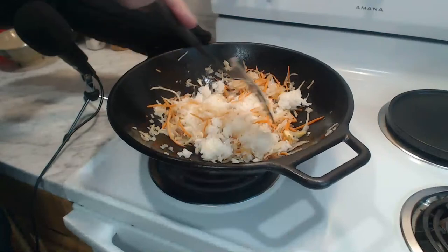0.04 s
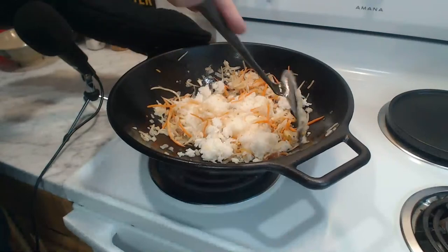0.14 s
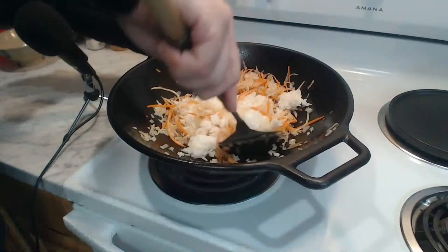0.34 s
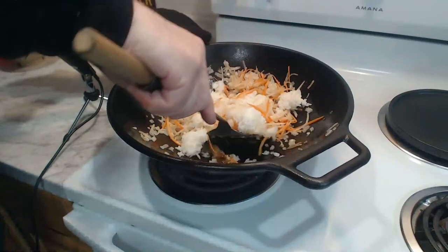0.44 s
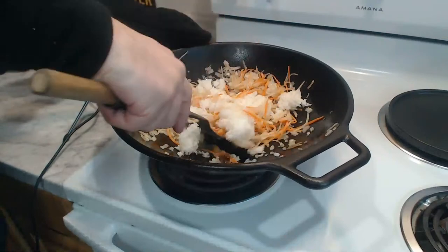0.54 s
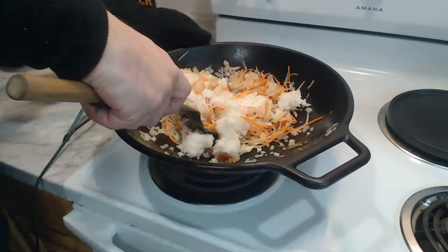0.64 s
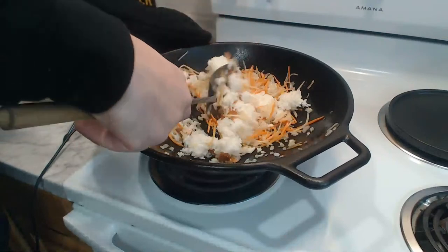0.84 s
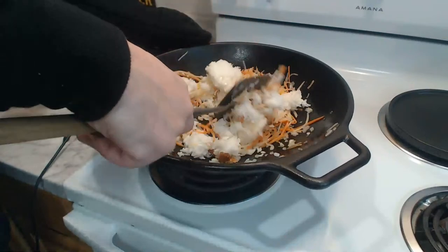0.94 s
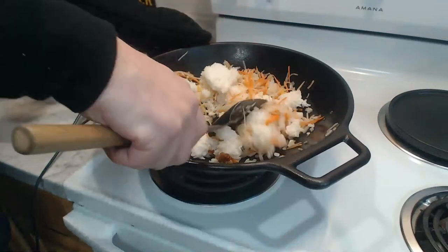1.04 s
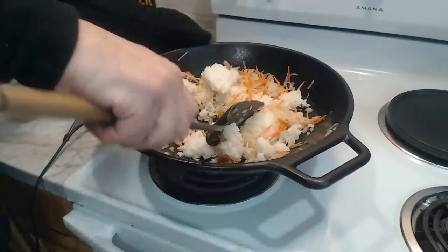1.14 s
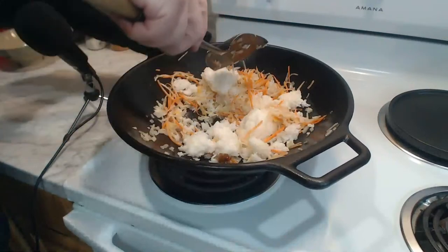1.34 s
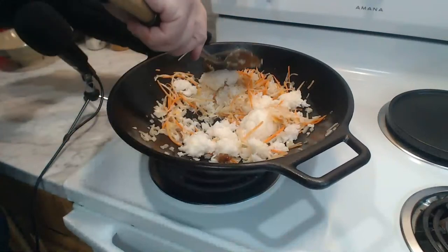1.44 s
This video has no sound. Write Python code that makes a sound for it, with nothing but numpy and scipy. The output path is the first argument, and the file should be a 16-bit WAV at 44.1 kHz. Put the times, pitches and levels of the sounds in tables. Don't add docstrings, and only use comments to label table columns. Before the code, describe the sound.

A metal spatula hits a cast iron wok with a bright ringing clank, scrapes gratingly down into rice, pauses, then knocks the bottom more softly; faint food hiss, quiet home kitchen, close microphone.

```python
import sys
import numpy as np
from scipy import signal
from scipy.fft import rfft, irfft, next_fast_len
from scipy.io import wavfile
from scipy.ndimage import uniform_filter1d, map_coordinates

SR = 44100
rng = np.random.default_rng(int(sys.argv[2]) if len(sys.argv) > 2 else 0)


def field_ratio(decibels):
    return 10 ** (np.asarray(decibels, dtype=float) / 20)


def master_out(mix):
    frames = np.transpose(np.atleast_2d(mix))
    ceiling = np.clip(frames, -1, 1)
    pcm = np.round(ceiling * 32767).astype(np.int16)
    wavfile.write(sys.argv[1], SR, pcm)


N = 66150
T = np.arange(N) / SR


def unit(x):
    return x / np.sqrt(np.mean(x ** 2) + 1e-20)


def along(points, hz):
    f, v = np.transpose(points)
    return np.interp(np.log(hz + 1), np.log(f + 1), v)


def joined(hz, rows):
    return [(f, *row) for f, row in zip(hz, rows)]


def wobble(rate):
    return map_coordinates(rng.standard_normal(int(N * rate / SR) + 4), [T * rate])


def filtered(x, response):
    m = next_fast_len(N + SR // 2)
    return irfft(rfft(x, m) * response(np.fft.rfftfreq(m, 1 / SR)), m)[:N]


def highpass(corner_hz):
    return lambda f: (1j * f / (corner_hz + 1j * f)) ** 2


def resonant(peaks):
    def response(f):
        total = 0
        for k, (hz, width, db) in enumerate(peaks):
            damping = 1j * f * width
            total = total + (-1) ** k * field_ratio(db) * damping / (hz * hz - f * f + damping)
        return total
    return response


def dying(t60s, spectrum=((1, 0),)):
    hz, t, z = signal.stft(rng.standard_normal(SR // 2), SR, nperseg=128)
    z = z * field_ratio(along(spectrum, hz))[:, None]
    z = z / unit(np.abs(z)).mean() / np.abs(z).std()
    decay = field_ratio(-60 * t / along(t60s, hz)[:, None])
    return signal.istft(z * decay, SR, nperseg=128)[1][:SR // 2]


def rush(spectrum, patchy_db):
    z = signal.stft(rng.standard_normal(N), nperseg=512)[2]
    field = uniform_filter1d(rng.standard_normal(z.shape), 4, 0)
    field = uniform_filter1d(field, 10, 1)
    x = signal.istft(z * field_ratio(patchy_db * unit(field)), nperseg=512)[1][:N]
    return unit(filtered(x, lambda hz: field_ratio(along(spectrum, hz))))


# (time [s], level [dB])
SIZZLE = [(0, -72), (.2, -75), (.5, -70.5), (.65, -71), (1.0, -73.5), (1.11, -71.5), (1.15, -65.5),
          (1.5, -67.5)]
# (frequency [Hz], level [dB per Hz])
FIZZ = [(900, -27.5), (1500, -9.5), (2400, -3.5), (4300, -4.5), (7500, -7), (10000, -1), (12500, -8),
        (15800, -10)]
# (frequency [Hz], level [dB per Hz])
AIR = [(20, -21), (60, -15.5), (97, -13.5), (282, -5.5), (572, -9.5), (1050, -9.5), (1300, -17),
       (3000, -39)]
# (frequency [Hz], level [dB])
HUM = [(120, -74.5), (240, -82), (360, -80.5), (572, -82)]


def kitchen():
    fizz = field_ratio(np.interp(T, *np.transpose(SIZZLE)) + 0.78 * wobble(25)) * rush(FIZZ, patchy_db=1.6)
    air_db = -74.5 + 4.5 * T + 2.3 * wobble(2.6)
    air = field_ratio(air_db) * rush(AIR, patchy_db=2.5)
    hum = np.zeros(N)
    for hz, db in HUM:
        level = field_ratio(db + 2.5 + 0.8 * wobble(6.8))
        hum += level * np.sin(2 * np.pi * hz * T + 0.35 * wobble(1.8))
    return fizz + air + hum


# (frequency [Hz], width [Hz], level [dB])
CRACK = [(10000, 2000, 3.5), (5600, 2600, -9)]


def struck(contacts, modes, spread_db, attack_s, low_hz, body_db, spectrum, t60s, crack_db, flutter):
    muffle_s, muffle_db_per_s = 0.18, 132
    flutter_per_s, knots = 100, 99
    crack_grows, crack_t60_s = 1.7, 0.008
    rings, cracks = np.zeros(N + SR), np.zeros(N + SR)
    t = T[:SR // 4]
    attack = 1 - np.exp(-t / attack_s)
    muffle = field_ratio(-muffle_db_per_s * np.maximum(t - muffle_s, 0))
    shape = attack * muffle * np.sqrt(1 - t / t[-1])

    def drift():
        return flutter * np.interp(t * flutter_per_s, np.arange(knots), rng.standard_normal(knots))

    for s, db in contacts:
        ring = np.zeros(len(t))
        for hz, mode_db, t60 in modes:
            decay = field_ratio(mode_db + spread_db * rng.normal() - 60 * t / t60)
            ring += decay * (1 + drift()) * np.sin(2 * np.pi * hz * t + drift())
        body = dying(t60s, spectrum)[:len(t)]
        body = field_ratio(body_db) * body / np.std(body[:256])
        crack = field_ratio(crack_grows * db + crack_db - 60 * t / crack_t60_s) * rng.standard_normal(len(t))
        start = round(s * SR)
        rings[start:start + len(t)] += field_ratio(db - 8) * shape * (ring + body)
        cracks[start:start + len(t)] += crack
    return filtered(rings[:N], highpass(low_hz)) + filtered(cracks[:N], resonant(CRACK))


# (time [s], strength [dB])
BLOWS = [
    (.1945, -41),
    (.1985, -32),
    (.2, -29),
    (.2015, -4),
    (.2045, -10.5),
    (.2078, -10),
    (.2198, -19.5),
    (.2445, -20),
    (.275, -27),
]
RIM_HZ = [770, 1068, 1109, 1244, 1432, 1902, 2083, 2245, 2545, 2800, 2885, 3138, 3246, 3558]
# (level [dB], t60 [s])
RIM = [(-21.5, 0.17), (-17, 0.2), (-7, 0.13), (-4, 0.079), (-21.5, 0.62), (-19, 0.14), (-32.5, 0.32),
       (-34.5, 0.27), (-17.5, 0.24), (-11.5, 0.52), (-12, 0.21), (-19.5, 0.34), (-22, 0.05), (-23.5, 0.62)]
LIP_HZ = [3801, 4037, 4445, 4578, 4641, 4776, 4857, 5184, 5410, 5706, 5920, 6928, 7154, 7497]
# (level [dB], t60 [s])
LIP = [(-21.5, .25), (-4, 0.16), (-17, 0.26), (-17.5, 0.46), (-16.5, 0.15), (-13, 0.22), (-18.5, 0.4),
       (-20.5, 0.08), (-26.5, 0.11), (-19, .1), (2, 0.086), (-27, 0.28), (-27.5, 0.25), (-12.5, 0.18)]
# (frequency [Hz], level [dB], t60 [s])
BLADE = [(8193, -8.5, 0.23), (8270, 1.5, 0.083), (8820, -3, 0.44), (9440, -7.5, 0.6), (10460, 1, .04),
         (10670, -9, 0.045), (12400, -17.5, 0.47), (11400, -28, .3), (14600, -21, 0.27)]
# (frequency [Hz], level [dB per Hz])
CLANG = [(240, -77), (400, -49.5), (1080, -8), (2370, -20), (2800, -6.5), (5850, -3.5), (6510, -21),
         (9410, -10.5), (15600, -34)]
# (frequency [Hz], t60 [s])
CLANG_T60 = [(150, 0.094), (1000, 0.07), (4000, 0.058), (12000, 0.15)]


def rim_blow():
    blade = [(hz, db - 18, t60) for hz, db, t60 in BLADE]
    modes = joined(RIM_HZ, RIM) + joined(LIP_HZ, LIP) + blade
    return struck(BLOWS, modes, spread_db=2.4, attack_s=0.0015, low_hz=410, body_db=-4.5,
                  spectrum=CLANG, t60s=CLANG_T60, crack_db=6, flutter=0.45)


# (time [s], pressure [dB], bare metal contact [dB])
STROKE = [
    (0.2, -46, 14.5),
    (0.233, -37.5, 10.5),
    (0.292, -28.5, 4),
    (0.334, -35, -1.5),
    (0.394, -32, -4),
    (0.439, -39, -7.5),
    (0.479, -42.5, -10.5),
    (0.546, -52.5, -10.5),
    (0.63, -81, 7.5),
]
# (frequency [Hz], width [Hz], level [dB])
WALL = [(640, 20, -15.5), (910, 35, 0), (1113, 38, -4.5), (1437, 46, 1.5), (1746, 35, -2), (1865, 64, -0.5),
        (2530, 70, -9.5), (2685, 57, -6.5), (3230, 60, -10)]
# (frequency [Hz], width [Hz], level [dB])
FLOOR = [(616, 49, -13), (801, 27, -5), (902, 53, -3.5), (1304, 91, -6.5), (1643, 75, -1.5), (1714, 47, 1),
         (1778, 100, -4), (2666, 51, -10.5), (3220, 79, -15)]
# (frequency [Hz], width [Hz], level [dB])
EDGE = [(2610, 96, -10.5), (3760, 70, 0), (4656, 150, -1), (4800, 100, -7.5), (6000, 84, -12),
        (7523, 70, -15.5), (8400, 130, -8.5), (9070, 100, -4), (10720, 300, -9)]
# (frequency [Hz], level [dB per Hz])
RASP = [(40, -30), (250, -18.5), (520, -24), (929, -3), (2270, -14), (4720, -7.5), (10600, -25),
        (15600, -25.5)]


def scrape():
    slips_per_s, slip_spread_db = 3700, 1.5
    s, press_db, bare_db = np.transpose(STROKE)
    press = field_ratio(np.interp(T, s, press_db, -120, -120) + 0.63 * wobble(70))
    bare = field_ratio(np.interp(T, s, bare_db) + 1.2 * wobble(40))
    slip_size = field_ratio(slip_spread_db * np.clip(rng.standard_normal(N), -2, 2))
    slips = (rng.random(N) < slips_per_s / SR) * slip_size * rng.choice([-1, 1], size=N)
    drive = unit(unit(slips) + 0.69 * rush([(1, 0)], patchy_db=1.5))
    bite = np.interp(T, (0.35, 0.3), [0.3, 1])
    low = np.interp(T, (0.37, 0.435), [0, 1])

    def through(db, force, response):
        return field_ratio(db) * filtered(force * drive, response) / np.std(filtered(drive, response))

    wall = through(-3.5, press * bite * np.sqrt(1 - low), resonant(WALL))
    floor = through(-4, press * np.sqrt(low), resonant(FLOOR))
    edge = through(-9.5, press * bare, resonant(EDGE))
    rasp = unit(filtered(drive, lambda hz: field_ratio(along(RASP, hz))))
    return wall + floor + edge + field_ratio(-4) * press * bare * rasp


# (time [s], frequency [Hz], level [dB], t60 [s])
STAND = [
    (0.204, 158.6, -31, 0.29),
    (.203, 167.7, -36, 0.65),
    (.222, 373, -39.5, 0.27),
    (1.123, 189, -43, 0.11),
]


def stand():
    thump = np.zeros(N)
    for s, hz, db, t60 in STAND:
        age = np.maximum(T - s, 0)
        swell = field_ratio(db - 60 * age / t60) * (1 - np.exp(-age / 0.0024))
        thump += swell * np.sin(2 * np.pi * hz * age)
    return filtered(thump, highpass(70))


# (time [s], length [s], frequency [Hz])
NUDGE_AT = [(.73, .08, 410), (.78, .13, 356), (.845, .06, 752), (.97, .064, 335), (1.074, .06, 405),
            (1.232, .064, 325), (1.27, .08, 2140), (1.385, .045, 5750), (1.425, .07, 348), (.73, .05, 250),
            (.82, .084, 4900), (.56, .09, 8500), (.807, .15, 7300), (1.078, .037, 8100), (.4, .16, 247),
            (.22, .36, 75), (.443, .055, 903), (.5, .045, 872), (.365, .05, 1785), (.29, .04, 945),
            (.32, .045, 1720), (.42, .09, 1720), (1.19, .04, 70), (1.22, .08, 2520), (.56, .16, 1500),
            (.27, .05, 2830), (.24, .02, 7497)]
# (width [Hz], level [dB])
NUDGES = [(20, -66.5), (18.1, -66.5), (25, -69.5), (30, -76.5), (30, -67), (35, -67.5), (40, -73),
          (900, -66.5), (20, -64.5), (220, -72), (110, -77), (5100, -71), (7000, -71.5), (6100, -63.5),
          (50, -65), (60.3, -64.5), (11.3, -45), (27, -46), (25, -46), (30, -43), (37.8, -42), (65, -48.5),
          (50, -80), (60, -67), (1500, -77), (90, -37), (90, -35.5)]


def nudges():
    out = np.zeros(N)
    for (s, length, hz), (width_hz, db) in zip(NUDGE_AT, NUDGES):
        mode = resonant([(hz, width_hz, 0)])
        tone = unit(filtered(rng.standard_normal(N), lambda f: mode(f) ** 2))
        span = np.sin(np.pi * np.clip((T - s) / length, 0, 1))
        even = np.linalg.norm(span) / (np.linalg.norm(span * tone) + 1e-12)
        out += field_ratio(db) * span * tone * even
    return out


# (time [s], strength [dB])
KNOCKS = [
    (.388, -34),
    (1.1185, -36),
    (1.1225, -23),
    (1.1265, -25.5),
    (1.1345, -25),
    (1.163, -48),
    (1.171, -35.5),
    (1.183, -49),
    (1.198, -46),
    (1.212, -45.5),
]
BOWL_HZ = [775, 1060, 1170, 1238, 1300, 1600, 2512, 2672, 2826, 3257, 3560, 3800, 4231, 4820, 5819]
# (level [dB], t60 [s])
BOWL = [(-10.5, 0.18), (-4, 0.091), (-8, 0.15), (-11.5, 0.23), (-9.5, 0.16), (-9, 0.1), (-12, 0.24),
        (-6, 0.094), (-18.5, 0.24), (-14, 0.079), (-2.5, 0.095), (-17, 0.21), (-19.5, 0.11), (-10.5, 0.08),
        (-22, 0.21)]
# (frequency [Hz], level [dB per Hz])
THUD = [(60, -42), (300, -6), (1100, -3.5), (1950, -24), (2710, -1), (3940, -17), (7000, -30), (16000, -47)]
# (frequency [Hz], t60 [s])
THUD_T60 = [(150, 0.08), (1500, 0.14), (8000, 0.14)]


def bottom_knock():
    return struck(KNOCKS, joined(BOWL_HZ, BOWL), spread_db=2.2, attack_s=0.0015, low_hz=140, body_db=-6,
                  spectrum=THUD, t60s=THUD_T60, crack_db=-33, flutter=0.9)


def squeak():
    span_s, climb_hz, level_db, rough = (1.215, 1.385), (3800, 4050), -74, 0.9
    turn = 2 * np.pi * np.cumsum(np.interp(T, span_s, climb_hz)) / SR
    swell = np.sin(np.pi * np.interp(T, span_s, [0, 1])).clip(0) ** 0.5
    broken = 1 + rough * wobble(43.7)
    return field_ratio(level_db) * swell * broken * np.sin(turn + rough * wobble(150))


# (frequency [Hz], t60 [s])
ROOM = [(200, 0.073), (2000, 0.047), (10000, 0.39)]


def echo(wok):
    tail = dying(ROOM)
    return signal.fftconvolve(np.pad(wok, (200, 0)), tail / np.linalg.norm(tail))[:N]


def scene():
    wok = rim_blow() + scrape() + stand() + bottom_knock()
    mid = kitchen() + wok + field_ratio(-17) * echo(wok) + nudges() + squeak()
    side = field_ratio(-31.5) * filtered(mid, lambda f: 1j * (f > 8100))
    return np.array([mid + side, mid - side])


def band_limit(x):
    return signal.sosfilt(signal.butter(12, 16500, fs=SR, output="sos"), x)


def record(dry):
    ceiling, top_hz = 0.85, 15800
    dry = dry / (1 + np.abs(dry / ceiling) ** 4) ** 0.25

    def band(hz):
        treble = field_ratio(np.interp(hz, [top_hz - 150, top_hz + 50], [0, -36]))
        return treble * (1j * hz / (35 + 1j * hz))

    mix = np.array([filtered(channel, band) for channel in dry]) - 0.0003
    return band_limit(mix)


dry = scene()
out = record(dry)
master_out(out)
```